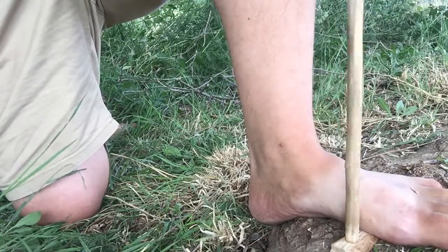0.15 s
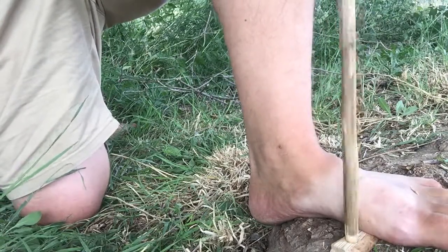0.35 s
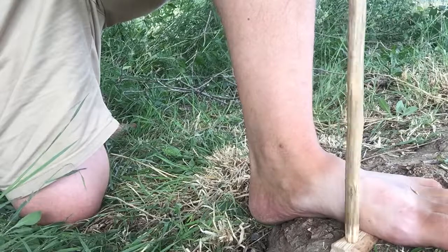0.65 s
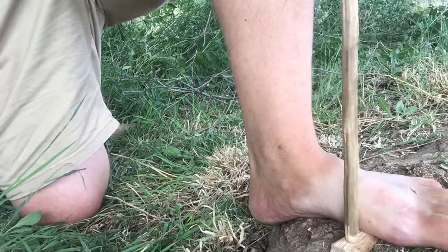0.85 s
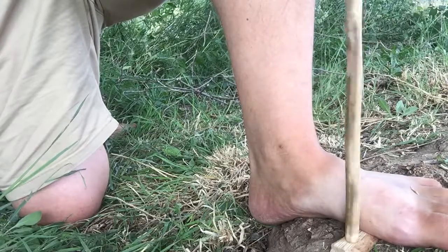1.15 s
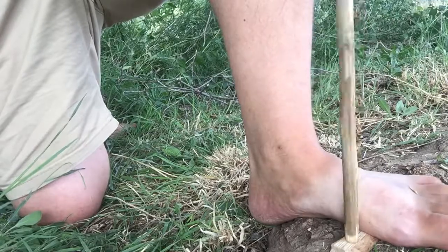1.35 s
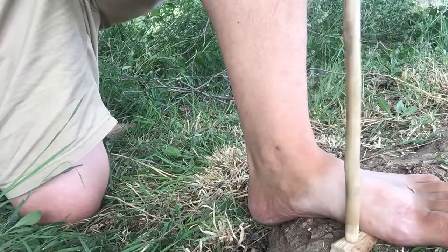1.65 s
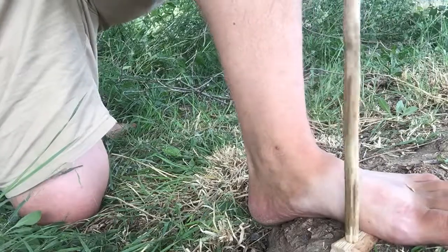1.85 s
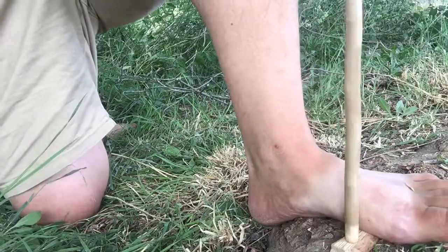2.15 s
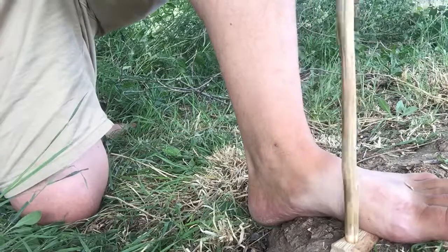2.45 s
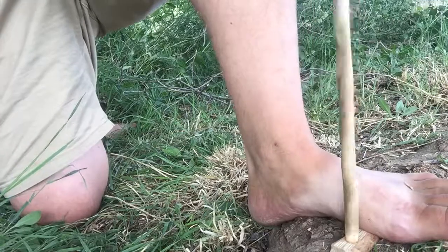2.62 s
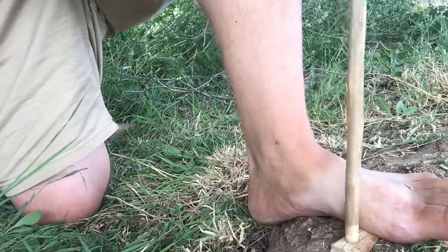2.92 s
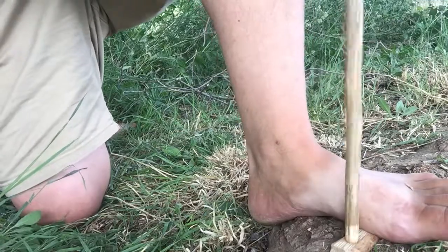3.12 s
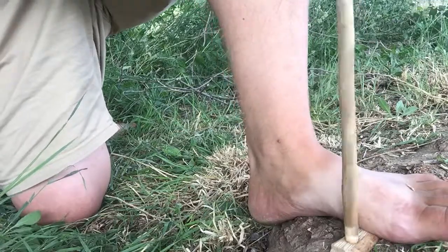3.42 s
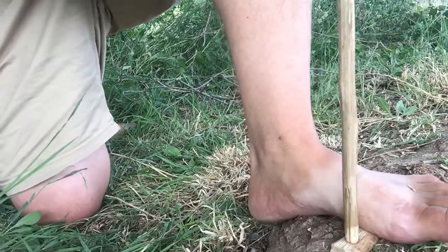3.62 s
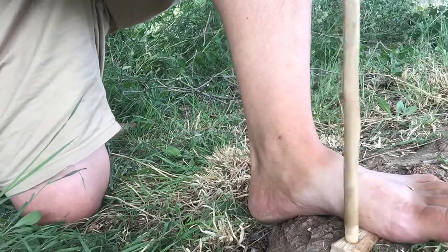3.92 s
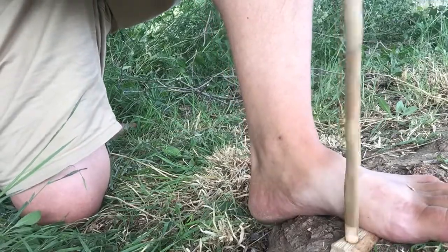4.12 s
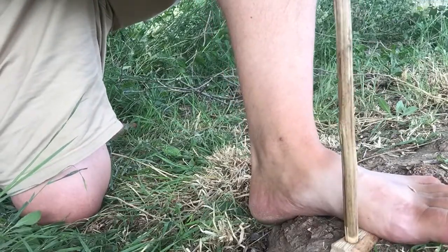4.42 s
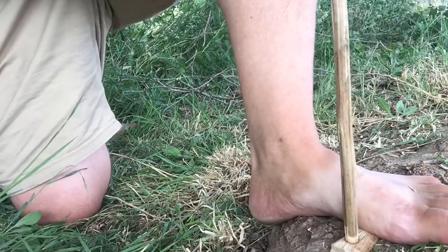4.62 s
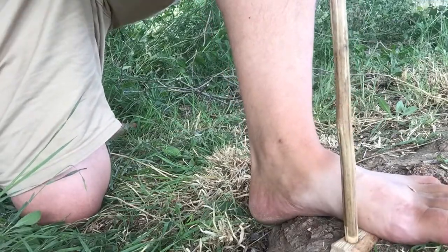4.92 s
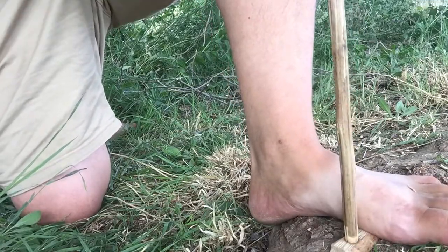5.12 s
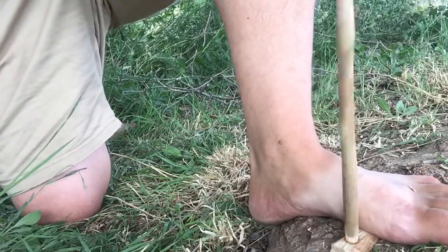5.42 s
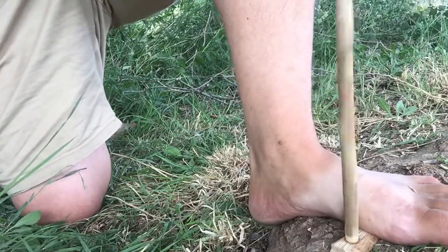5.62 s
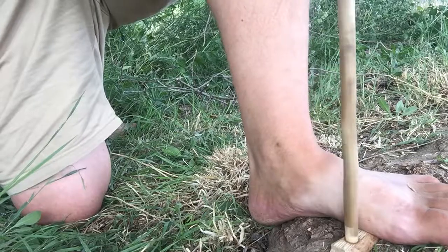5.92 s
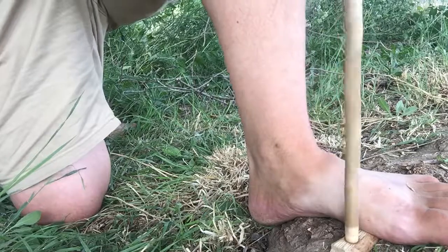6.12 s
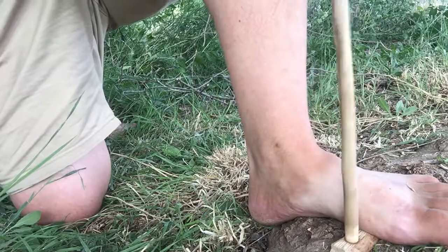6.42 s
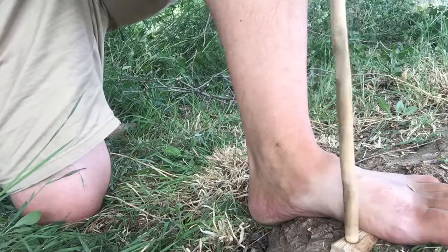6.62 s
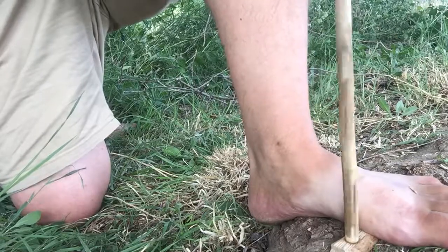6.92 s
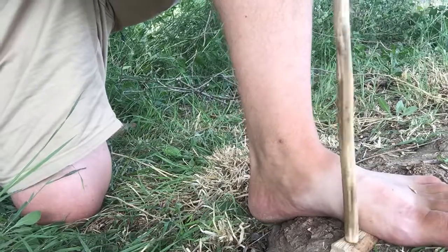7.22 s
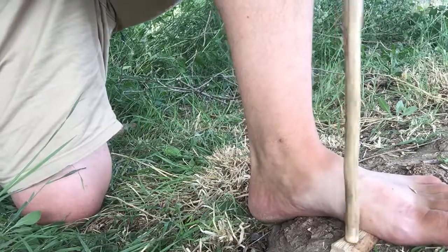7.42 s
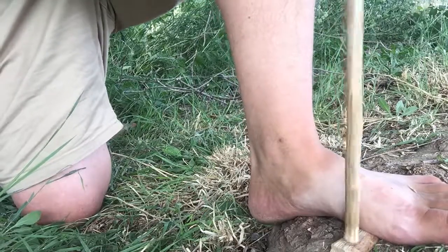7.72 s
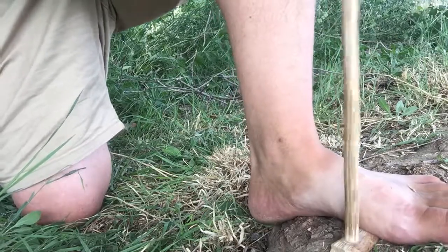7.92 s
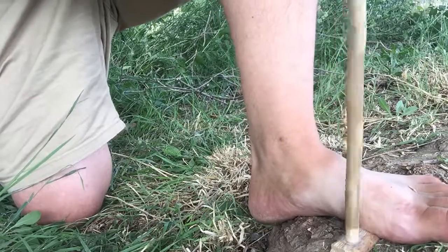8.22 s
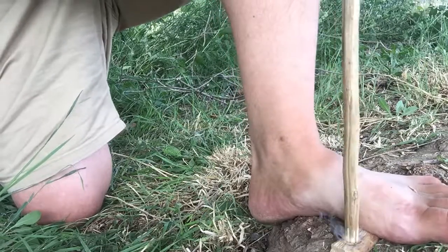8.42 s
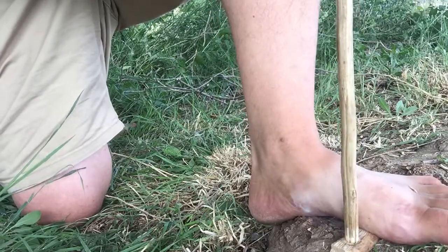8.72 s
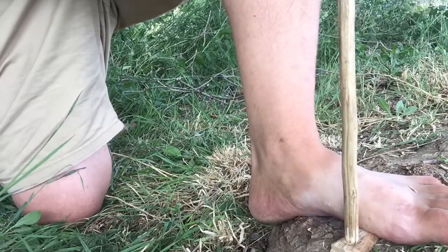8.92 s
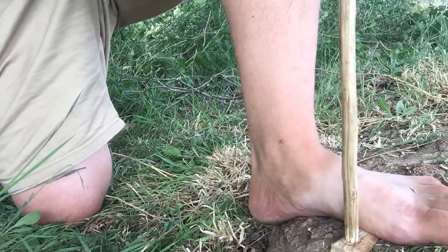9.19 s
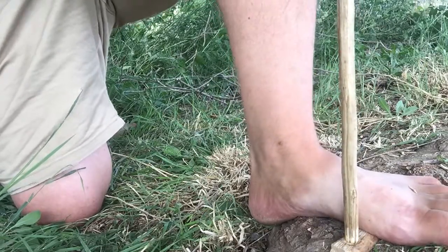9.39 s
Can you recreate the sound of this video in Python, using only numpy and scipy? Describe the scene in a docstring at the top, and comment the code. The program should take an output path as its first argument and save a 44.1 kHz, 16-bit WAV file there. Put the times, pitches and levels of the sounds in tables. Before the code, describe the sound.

Near microphone, dry open air with a faint low rumble. Wood on wood squeaks and creaks for nearly two seconds over airy rubbing, accelerating into a fast, gritty, back-and-forth scrape. After a quiet pause with small taps and distant birds, a second long bout scratches on, gradually weaker and limping in rhythm, then another pause with taps and a tiny restart.

```python
"""Hand drill outdoors

A wooden spindle is spun back and forth between the palms in a wooden hearth board.
At first the polished tip hisses and catches at each turn: clustered slips creak, locked slips squeal.
Then it bites: noise swells with each stroke, about ten a second, and shakes the spindle's resonances.
In two pauses the hands go back up with small noise taps; far birds are gliding sines over a low rumble."""
import sys
import numpy as np
from scipy import signal
from scipy.fft import rfft, irfft, next_fast_len
from scipy.io import wavfile
from scipy.ndimage import uniform_filter1d, map_coordinates

SR = 44100
rng = np.random.default_rng(int(sys.argv[2]) if len(sys.argv) > 2 else 0)


def file_out(sig):
    """Save sig as 16-bit WAV at sys.argv[1]."""
    # one column per channel
    cols = np.atleast_2d(sig).T
    # limit, then scale
    lim = np.clip(cols, -1, 1)
    pcm = np.round(lim * 32767).astype(np.int16)
    wavfile.write(sys.argv[1], SR, pcm)


N = 421155
TOP_HZ = 16100  # upper band limit


def amp(db):
    """Decibels to gain."""
    return 10 ** (np.asarray(db) / 20)


def unit(x):
    """Scale to rms 1."""
    return x / np.sqrt(np.mean(x ** 2) + 1e-20)


def curve(points, at):
    """Read a curve whose points are joined by straight lines."""
    return np.interp(at, *np.transpose(points))


def add(track, start_s, x):
    """Mix x into the track from start_s."""
    i = round(start_s * SR)
    x, i = x[max(-i, 0):], max(i, 0)
    track[i:i + len(x)] += x[:max(len(track) - i, 0)]


def wobble(rate_hz, size=N):
    """A smooth random curve, rate_hz knots a second."""
    knots = rng.standard_normal(int(size * rate_hz / SR) + 4)
    at = np.linspace(0, len(knots) - 1, 10 * len(knots))
    smooth = map_coordinates(knots, [at], mode="nearest")
    return np.interp(np.arange(size) * rate_hz / SR, at, smooth)


# Spindle and board resonances. Each row: centre in Hz, width in Hz, peak in dB at a wood share of 1.
WOOD_MODES = [(1460, 520, 1.5), (1670, 190, 3.5), (2135, 750, 0.5), (2780, 280, 7.5), (3680, 450, 5),
              (4490, 230, 7.5), (5904, 700, 5.5)]


def colour(x, spectrum, wood=0.0, size=16384):
    """Causal minimum-phase filter: a smooth spectrum (Hz, dB) times a share of the wood's resonances."""
    hz = np.fft.rfftfreq(size, 1 / SR)
    f, level_db = np.transpose(spectrum)
    db = np.interp(np.log(hz + 1), np.log(f), level_db)
    db = db + wood * sum(peak / (1 + (2 * (hz - c) / w) ** 2) for c, w, peak in WOOD_MODES)
    cepstrum = irfft(np.log(unit(amp(db)) + 1e-6))  # unit energy
    cepstrum[1:size // 2] *= 2
    cepstrum[size // 2 + 1:] = 0
    impulse = irfft(np.exp(rfft(cepstrum)))
    return signal.fftconvolve(x, impulse)[:len(x)]


def grit(clump_db, clump_hz):
    """Countless tiny fibre contacts, bunched into clumps."""
    return rng.standard_normal(N) * amp(clump_db * wobble(clump_hz))


def patchy(x, depth_db):
    """Patches of the spectrum swell and fade, as when a contact wanders in its socket; rms 1."""
    z = signal.stft(x, nperseg=512)[2]
    field = uniform_filter1d(rng.standard_normal(z.shape), 6, axis=0)
    field = uniform_filter1d(field, size=7, axis=1)
    return unit(signal.istft(z * amp(depth_db * unit(field)), nperseg=512)[1][:N])


# Rumble level. Each row: time in seconds, relative level in dB.
RUMBLE_LEVEL = [(0, -62), (.66, -63), (.73, -54.5), (.82, -65.5), (2.3, -59), (4.5, -59.5), (7.5, -59.5),
                (8.901, -59.5), (9.55, -56.5)]
# Rumble spectrum. Each row: frequency in Hz, relative level in dB per Hz.
RUMBLE_SPECTRUM = [(13, -69.5), (22, -52), (34, -30.5), (42, -5), (92, 5.5), (133, 1.5), (205, -8),
                   (295, -29), (400, -40), (520, -62), (880, -120)]
# Open-air hiss spectrum. Each row: frequency in Hz, relative level in dB per Hz.
AIR_SPECTRUM = [(280, -6.5), (430, -12), (1050, -7.5), (1600, -16.5), (4200, -19.5), (9000, -29),
                (16000, -37.5)]


def outdoors():
    """A low unsteady rumble under a faint open-air hiss."""
    rumble_db = curve(RUMBLE_LEVEL, np.arange(N) / SR) + 6.5 + 1.9 * wobble(9)
    rumble = amp(rumble_db) * unit(colour(rng.standard_normal(N), RUMBLE_SPECTRUM))
    hiss = patchy(colour(rng.standard_normal(N), AIR_SPECTRUM), depth_db=1)
    return rumble + amp(-63.0 + 0.54 * wobble(2.5)) * hiss


# Far bird notes. Each row: start in seconds, end in seconds, first Hz, last Hz, peak level in dB.
BIRD_NOTES = [(4.542, 4.574, 3645, 3570, -61.5), (4.712, 4.75, 2870, 3290, -57),
              (4.792, 4.865, 4210, 3770, -59), (5.19, 5.232, 3250, 3400, -66),
              (8.621, 8.67, 3300, 2800, -58.5), (8.785, 8.825, 3500, 3700, -62),
              (8.821, 8.896, 4212, 3823, -58.5), (9.104, 9.133, 9160, 7930, -64)]


def birds():
    """Thin, slightly trembling notes: gliding sines that swell and fade."""
    out = np.zeros(N)
    for start, end, first_hz, last_hz, db in BIRD_NOTES:
        u = np.linspace(0, 1, max(int((end - start) * SR), 2))
        hz = first_hz + (last_hz - first_hz) * u
        hz = hz * (1 + 0.015 * wobble(217, size=len(u)))
        tone = np.sin(2 * np.pi * np.cumsum(hz) / SR)
        add(out, start, amp(db) * np.sin(np.pi * u) * tone)
    return out


def foliage(x):
    """Grass and bushes scatter a faint, short echo: convolution with decaying noise."""
    t = np.arange(SR // 3) / SR
    tail = colour(rng.standard_normal(len(t)) * amp(-60 * t / 0.52), [(4000, -4), (15000, -6)])
    return signal.fftconvolve(x, tail / np.linalg.norm(tail))[:N]


ROCKING_START_S, ROCKING_END_S = 5.55, 6.25  # the board sits loose
ROCK_DB = -46.5
TURN_KNOCK_DB, SNAP_KNOCK_DB = -43, -41  # relative to the creak, to the snap


def knocks():
    """Board jolts when the tip sticks or breaks loose, and on forward strokes while loose: (s, dB)."""
    turns = [((start + end) / 2, creak_db + TURN_KNOCK_DB)
             for start, end, *_, creak_db in CATCHES + RELEASES]
    snaps = [(s, db + SNAP_KNOCK_DB) for s, db in SNAPS]
    rocks = [(s, ROCK_DB) for s, _, _, is_back in strokes()
             if ROCKING_START_S < s < ROCKING_END_S and not is_back]
    return turns + snaps + rocks


# Hands tapping the spindle for a new grip. Each row: start in seconds, level in dB, 60 dB decay in seconds.
TAPS = [(4.439, -51.5, 0.05), (4.837, -55.5, 0.033), (4.998, -56, 0.12), (8.554, -54, 0.03),
        (9.057, -53.5, 0.031), (9.206, -46, 0.0183)]


def handling():
    """Light taps of the hands on the spindle, and dull knocks of the board, which the soil damps."""
    taps, thuds, t = np.zeros(N), np.zeros(N), np.arange(SR // 5) / SR
    for s, db, t60_s in TAPS:
        add(taps, s, amp(db - 60 * t / t60_s) * rng.standard_normal(len(t)))
    for s, db in knocks():
        add(thuds, s, amp(db - 60 * t / 0.089) * rng.standard_normal(len(t)))
    tap_spectrum = [(400, -20.5), (2000, 1.5), (4100, -4.0), (7000, -6.0), (15000, -14)]
    thud_spectrum = [(60, -10), (220, -7.5), (340, 1.5), (500, -3.5), (720, -13), (2000, -16.0)]
    return colour(taps, tap_spectrum, wood=1.31) + colour(thuds, thud_spectrum)


# Palm pressure as rubbing level. Each row: time in seconds, relative level in dB.
GLIDE_PRESSURE = [(0, -40), (.35, -39.5), (.6, -43.5), (.9, -40), (1.12, -41.5), (1.5, -38), (1.82, -33.5)]
# Hiss spectrum of the smooth tip. Each row: frequency in Hz, relative level in dB per Hz.
GLIDE_SPECTRUM = [(240, -52.5), (400, -29.5), (839, -17), (1600, -1.5), (2020, -11), (2250, 0), (3370, -10),
                  (4580, -4.5), (5030, -11.5), (5690, -6), (8110, -9), (12700, -7), (16000, -15)]
POLISHED_START_S, POLISHED_END_S = -.02, 1.86  # the tip is still smooth and glides
GLIDE_SWELL_DB = 3.5  # a glide is fastest, and loudest, halfway between turns


def gliding():
    """The polished tip hisses from each release to the next catch; while caught, only the palms rub."""
    t, moving = np.arange(N) / SR, np.zeros(N)
    starts = [POLISHED_START_S] + [end - .008 for _, end, *_ in RELEASES]
    ends = [end + .004 for _, end, *_ in CATCHES] + [POLISHED_END_S]
    for start, end in zip(starts, ends):
        swell = np.sin(np.pi * np.clip((t - start) / (end - start), 0, 1))
        fade = np.clip(np.minimum(t - start, end - t) / 0.0076, 0, 1)
        moving += amp(GLIDE_SWELL_DB * (swell - 2 / np.pi)) * fade
    palms = amp(-61.5) * (t < POLISHED_END_S)
    level = np.hypot(moving * amp(curve(GLIDE_PRESSURE, t)), palms)
    hiss = patchy(colour(grit(clump_db=2.0, clump_hz=944), GLIDE_SPECTRUM, wood=0.51), depth_db=2.5)
    return level * hiss * amp(-1.0 + 1.4 * wobble(45))


# The tip catches as the spindle slows. Each row: start in seconds, end in seconds,
# first squeal Hz, last squeal Hz, relative squeal level in dB, relative creak level in dB.
CATCHES = [(.153, .166, 467, 557, -51, -6.5), (.407, .427, 1860, 1697, -28.5, -23),
           (.704, .727, 569, 498.7, -45, -10.5), (.950, .965, 2301, 2243, -25, -23),
           (1.195, 1.212, 1535, 1200, -31.5, -15.5), (1.408, 1.418, 2100, 1950, -26, -13.5),
           (1.558, 1.563, 2280, 2250, -27, -12), (1.668, 1.671, 2169, 2221, -27, -9),
           (1.764, 1.767, 1740, 1600, -28.5, -16.5)]
# The tip works loose on the way back. Each row: start in seconds, end in seconds,
# first squeal Hz, last squeal Hz, relative squeal level in dB, relative creak level in dB.
RELEASES = [(.201, 0.242, 965, 950, -33, -5.5), (0.4567, .504, 1800, 2226, -28, -12),
            (.759, 0.814, 1500, 2250, -27, -7), (1.0044, 1.051, 2234, 2090, -23, -10),
            (1.2326, 1.27, 2130, 2330, -25, -7.5), (1.433, 1.467, 1600, 1338, -23, -8.5),
            (1.571, 1.578, 2514, 2400, -18.5, -13), (1.680, 1.687, 2690, 2350, -21, -2),
            (1.775, 1.781, 2240, 2350, -17, -14.5)]
CREAK_SHARE, SQUEAL_SHARE = .7, .48  # a release opens with a creak, closes with a squeal; they overlap
CREAK_FIRST_HZ, CREAK_LAST_HZ, RELEASE_S = 240.3, 481, .045  # slip rates in a release of this length
FASTEST_SLIP_HZ = 1250  # above this a catching tip slips hard only on every second squeal cycle


def creaks():
    """Stick-slip runs at each turn: (start s, end s, first slips per s, last slips per s, dB)."""
    for start, end, first_hz, last_hz, _, db in CATCHES:
        cycles = np.ceil(first_hz / FASTEST_SLIP_HZ)
        yield start, end, first_hz / cycles, last_hz / cycles, db
    for start, end, _, _, _, db in RELEASES:
        haste = np.sqrt(RELEASE_S / (end - start))  # a quicker turn packs the slips closer
        creak_end = start + CREAK_SHARE * (end - start)
        yield start, creak_end, haste * CREAK_FIRST_HZ, haste * CREAK_LAST_HZ, db


# Single slips as the tip breaks loose. Each row: time in seconds, relative level in dB.
SNAPS = [(0.1955, -10), (.754, -18), (0.9928, -8.5), (1.8701, -1), (2.057, -9.5), (2.1322, -10)]
# Click spectrum of a slip. Each row: frequency in Hz, relative level in dB per Hz.
SLIP_SPECTRUM = [(200, -26), (700, -23), (1100, -6.5), (1700, 2), (5500, -3), (7500, 0), (10000, 4),
                 (15500, 4)]


def creaking():
    """Each slip is a sharp click and a short ring of wood; in a release, slips crowd as speed rises."""
    slips = list(SNAPS)
    for start, end, first_hz, last_hz, db in creaks():
        u = np.linspace(0, 1, max(int((end - start) * SR), 2))
        cycles = np.cumsum(first_hz + (last_hz - first_hz) * u) / SR
        at = np.interp(np.arange(int(cycles[-1]) + 1), cycles, u)  # one slip per whole cycle
        chance = rng.standard_normal(size=(64, 2))[:len(at)]
        times = start + at * (end - start) + 0.0001 * chance[:, 0]
        slips += zip(times, db + chance[:, 1])
    force, scrape, t = np.zeros(N), np.zeros(N), np.arange(SR // 20) / SR
    for s, db in slips:
        crack = rng.standard_normal(len(t)) * amp(-60 * t / .0016)
        add(force, s, amp(db + 6.5) * crack / np.linalg.norm(crack))
        add(scrape, s, amp(db - 12) * rng.standard_normal(len(t)) * amp(-60 * t / 0.017))
    ring_spectrum = [(300, -29), (750, -17), (1050, -1.5), (2800, -4.5), (15000, 7)]
    return colour(force, SLIP_SPECTRUM, wood=0.37) + colour(scrape, ring_spectrum, wood=2.52)


def squeals():
    """A catch squeals throughout, a release once up to speed: (start s, end s, first Hz, last Hz, dB)."""
    for start, end, first_hz, last_hz, db, _ in CATCHES:
        yield start, end, first_hz, last_hz, db
    for start, end, first_hz, last_hz, db, _ in RELEASES:
        yield end - SQUEAL_SHARE * (end - start), end, first_hz, last_hz, db


# Squeal harmonics from the fundamental up. Each entry: relative level in dB.
HARMONICS_DB = [3, -7.5, -5, -7, -10.5, -9.5, -10.5, -19]
# Slow squeals are rougher. Each row: squeal frequency in Hz, roughness from 0 to 1.
ROUGHNESS = [(1500, .6), (2300, .15)]
# How well the spindle radiates a squeal. Each row: frequency in Hz, relative level in dB.
SQUEAL_TILT = [(500, 0), (1400, -0.5), (2300, 1), (5000, -2), (9000, 0), (15000, 1)]


def squealing():
    """Fast slips lock to a bending mode; overtones stop with the slipping, the mode rings on briefly."""
    out = np.zeros(N)
    for start, end, first_hz, last_hz, db in squeals():
        length_s = max(end - start, .002)
        t = np.arange(int(length_s * SR) + SR // 50) / SR
        glide_hz = np.interp(t, [0, length_s], [first_hz, last_hz])
        rough = np.clip(curve(ROUGHNESS, glide_hz), 0, 1)
        jitter = .045 * rough * wobble(1300, size=len(t)) + .008 * wobble(120, size=len(t))
        phase = 2 * np.pi * np.cumsum(glide_hz * (1 + jitter)) / SR
        after = np.maximum(t - length_s, 0)
        upper = sum(amp(level) * np.sin(k * phase + rng.uniform(0, 2 * np.pi)) * (k * first_hz < TOP_HZ)
                    for k, level in enumerate(HARMONICS_DB[1:], 2))
        upper = amp(5.6 * rough) * (upper + 0.069 * rng.standard_normal(len(t)))  # rough is also harsher
        mode = np.sin(phase) * amp(HARMONICS_DB[0] - 60 * after / .016)
        tone = mode + upper * amp(-60 * after / 0.0031)
        level = amp(db + 5.9 * rough * wobble(700, size=len(t)))
        add(out, start, tone * level * (1 - np.exp(-t / .0005)))
    return colour(out, SQUEAL_TILT, wood=.9)


# Runs of strokes, forth and back in one rhythm. Each row: start in seconds, end in seconds,
# slowing in seconds per stroke, limp from 0 to 1.
RUNS = [(1.871, 2.035, 0.00096, 0), (2.055, 2.135, 0, 0), (2.13, 3.172, .0001, 0.05),
        (3.171, 4.249, -0.00062, 0.86), (5.345, 5.464, -0.0034, 0), (5.495, 5.603, -0.0046, 0.14),
        (5.605, 6.761, -.00045, 0.34), (6.76, 8.421, .00012, 0.97), (9.527, 9.635, -0.0021, 0)]
# Palm pressure as rubbing level. Each row: time in seconds, relative level in dB.
RASP_PRESSURE = [(1.91, -32.5), (1.99, -36.5), (2.17, -31.5), (2.5, -33), (3.15, -33.5), (3.6, -39.5),
                 (4.2, -35), (5.4, -38), (5.55, -34.5), (6.7, -36), (6.81, -41.5), (7, -38.5), (7.22, -41),
                 (7.4, -40), (7.9, -38), (8.17, -40.5), (8.37, -45), (9.55, -47.5)]
STROKE_HZ = 10.3  # natural pace of the palms; each run holds a whole number of strokes
LIMP_EARLY_S, LIMP_DB = 0.0044, -2.5  # at full limp the back stroke comes early and is weaker
REST_S = .014  # the spindle stands still between strokes


def strokes():
    """Runs divided into alternating strokes: (start s, length s, dB, is a back stroke)."""
    for start, end, slowing_s, limp in RUNS:
        count = max(round((end - start) * STROKE_HZ), 1)
        k = np.arange(count + 1)
        back = k % 2
        turns = np.linspace(start, end, count + 1) + slowing_s * k * (k - count) / 2
        turns = turns - LIMP_EARLY_S * limp * back
        for s, period_s, is_back in zip(turns, np.diff(turns), back):
            db = curve(RASP_PRESSURE, s + period_s / 2) + LIMP_DB * limp * is_back
            yield s, period_s - REST_S, db, is_back


# The palms slide down the spindle from its top. Each row: start in seconds, end in seconds.
DESCENTS = [(1.87, 4.6), (5.35, 8.5)]
SHIFT_SHARE = 0.35  # middle part of a descent, over which the resonances change


def hands_low():
    """0 while the palms grip the top, 1 once they have slid down, until the next descent starts."""
    t, low = np.arange(N) / SR, np.zeros(N)
    for start, end in DESCENTS:
        way = (t - start) / (end - start)
        low = np.where(t >= start, np.clip(.5 + (way - .5) / SHIFT_SHARE, 0, 1), low)
    return low


# Rasp spectrum of the biting tip. Each row: frequency in Hz, relative level in dB per Hz.
RASP_SPECTRUM = [(300, -18.5), (720, -16), (1020, -5.5), (2000, -1.5), (6500, 0.5), (7600, -5.5),
                 (9600, -1.5), (10400, -7.5), (11400, -2.5), (15800, -9.5)]
# Spindle resonances that the palms leave free. Each row: nominal frequency in Hz, nominal width in Hz,
# relative level in dB with hands high, relative level in dB with hands low.
SPINDLE_MODES = [(935, 220, -31.5, -18), (1353, 180, -13, -13.5), (2270, 540, -10.5, -2),
                 (2896, 650, -5.5, -14), (3940, 233, -27, -10), (4540, 370, -10, -24)]


def rasping():
    """The tip breaks loose abruptly, speed swells and dies, and the spindle rests before turning back."""
    speed, force, t = np.zeros(N), np.zeros(N), np.arange(N) / SR
    starts = [row[0] for row in strokes()]
    for start, length_s, db, _ in strokes():
        age = np.arange(int(length_s * SR)) / SR
        arc = np.sin(np.pi * age / length_s).clip(0)
        bite = np.clip(np.minimum(age / 0.0014, (length_s - age) / 0.0044), 0, 1)
        add(speed, start, arc)
        add(force, start, amp(db) * bite * (0.9 * arc ** 1.31 + 0.25))
    rasp = patchy(colour(grit(clump_db=0.5, clump_hz=1510), RASP_SPECTRUM, wood=0.21), depth_db=2.5)
    stroke = np.searchsorted(starts, t)
    travel = np.cumsum(1 + .07 * (speed - .75))  # a faster scrape sounds a little higher
    body, low = np.zeros(N), hands_low()
    for hz, width_hz, high_db, low_db in SPINDLE_MODES:
        free = (1 - low) * amp(high_db) + low * amp(low_db)
        mode = signal.iirpeak(hz, hz / (1.2 * width_hz), SR)
        ring = signal.lfilter(*mode, rng.standard_normal(N))
        ring = unit(signal.lfilter(*mode, ring))
        grip = amp(2 * rng.standard_normal(len(starts) + 1))[stroke]  # each stroke damps the wood differently
        body += grip * free * np.interp(travel, np.arange(N), ring)
    chatter = amp(-5 + 2.15 * wobble(120)) * speed ** 0.67  # the wood is shaken most at full speed
    return force * amp(1.66 * wobble(65)) * (amp(-1) * rasp + chatter * body)


def scene():
    """The drill close by, the open air behind it."""
    song = birds()
    drill = handling() + gliding() + creaking() + squealing() + rasping()
    echo = foliage(amp(-25) * drill + amp(-13.0) * song)
    return (outdoors() + song + echo + drill)[None]


def record(dry):
    """Rounds off the sharpest peaks, then cuts steeply above the band limit."""
    rounded = dry / (1 + (dry / .8) ** 6) ** (1 / 6)
    size = next_fast_len(N + 8192)
    hz = np.fft.rfftfreq(size, 1 / SR)
    lowpass = 1 / np.sqrt(1 + (hz / TOP_HZ) ** 160)
    return irfft(rfft(rounded, size) * lowpass, size)[:, :N]


dry = scene()
out = record(dry)
file_out(out)
```